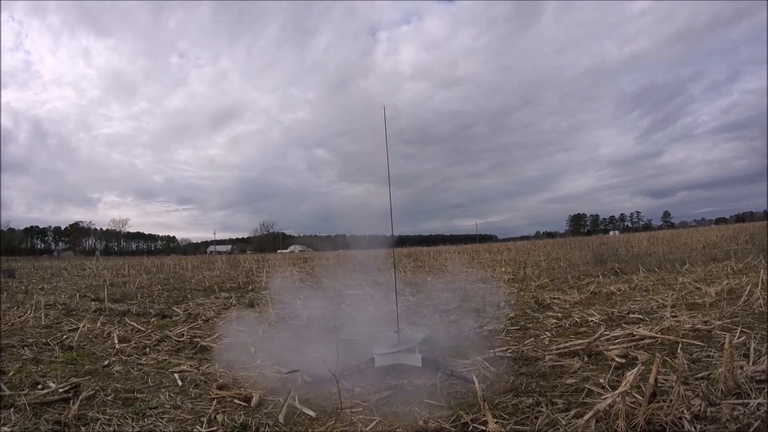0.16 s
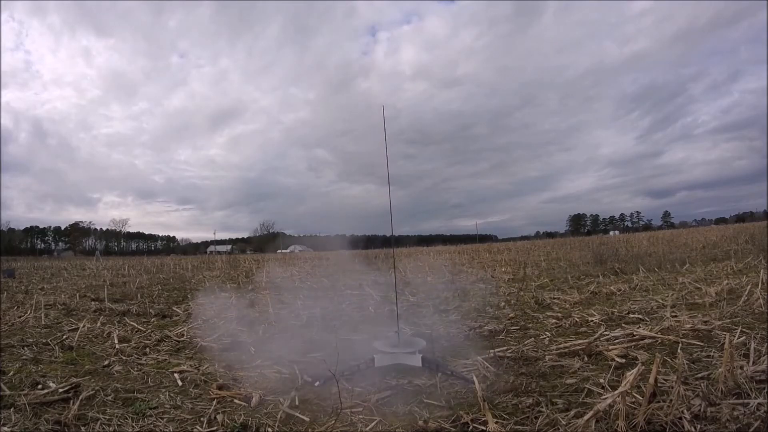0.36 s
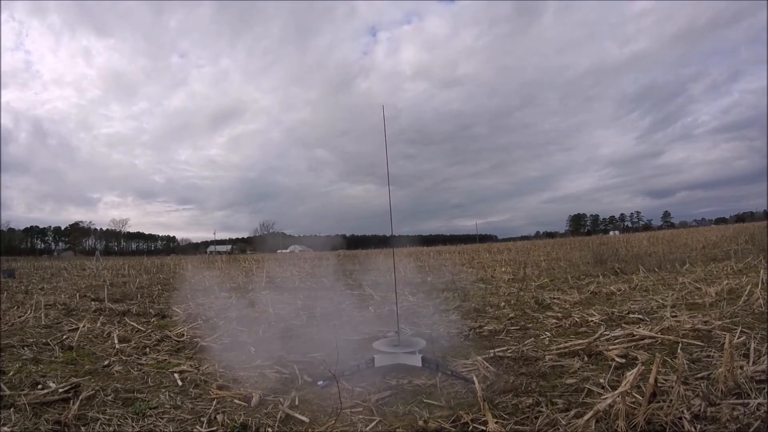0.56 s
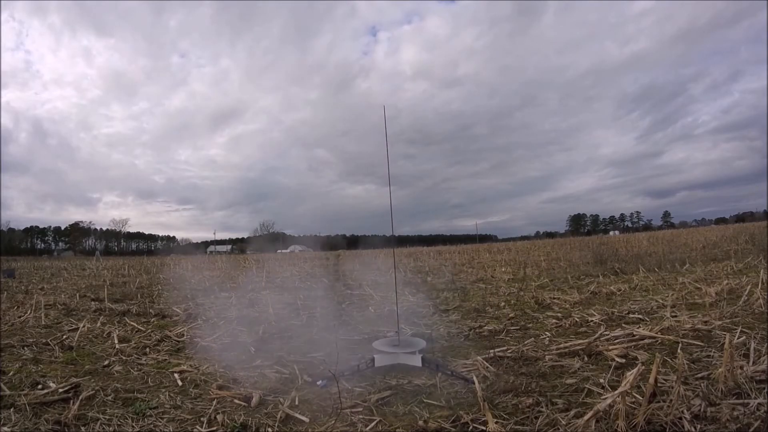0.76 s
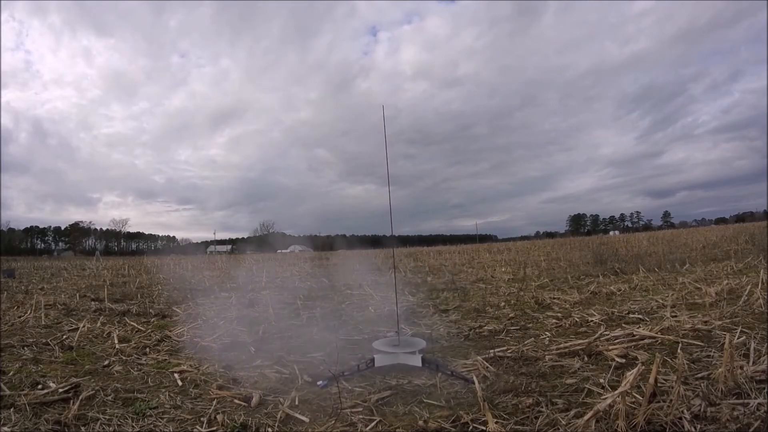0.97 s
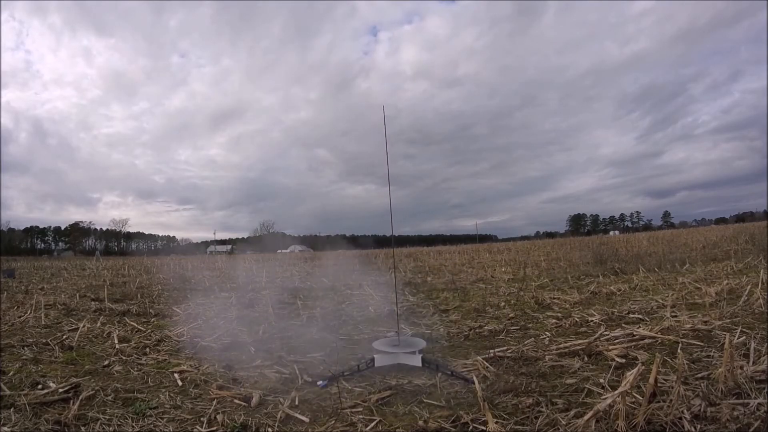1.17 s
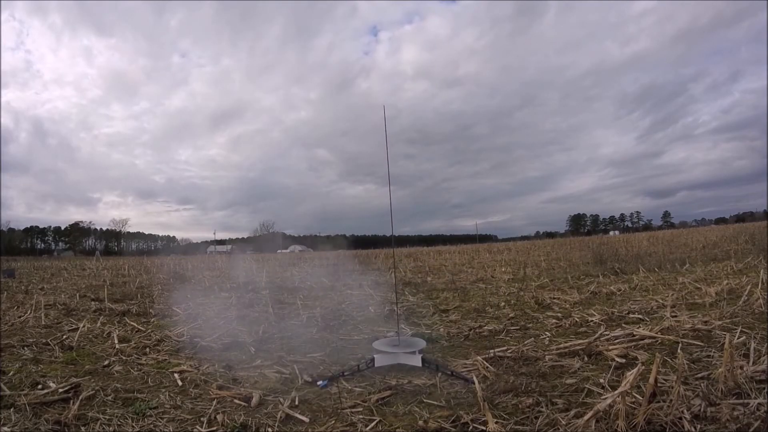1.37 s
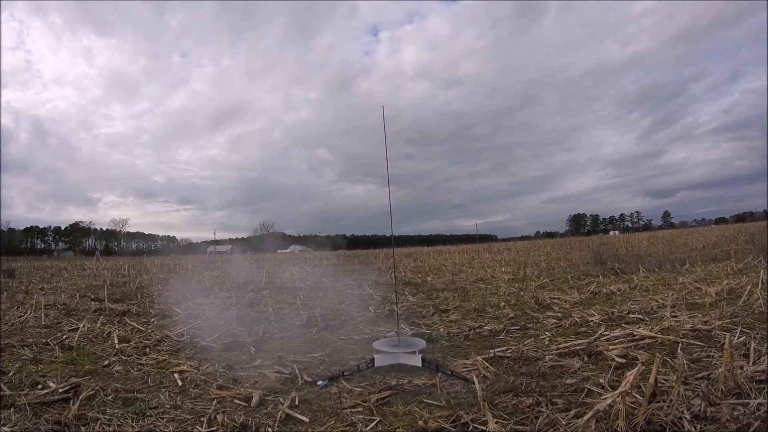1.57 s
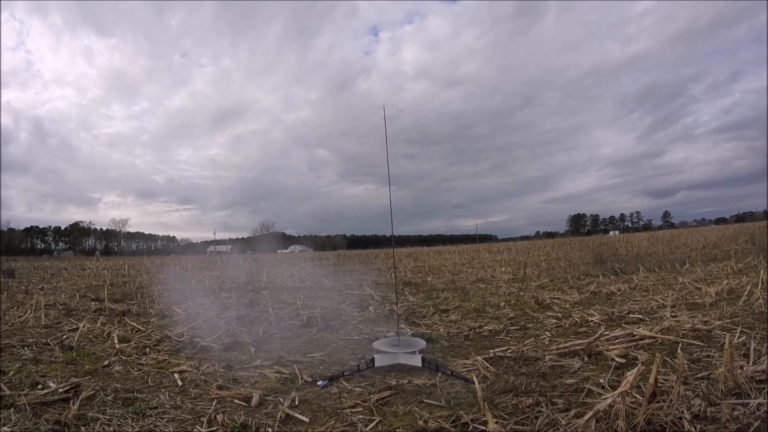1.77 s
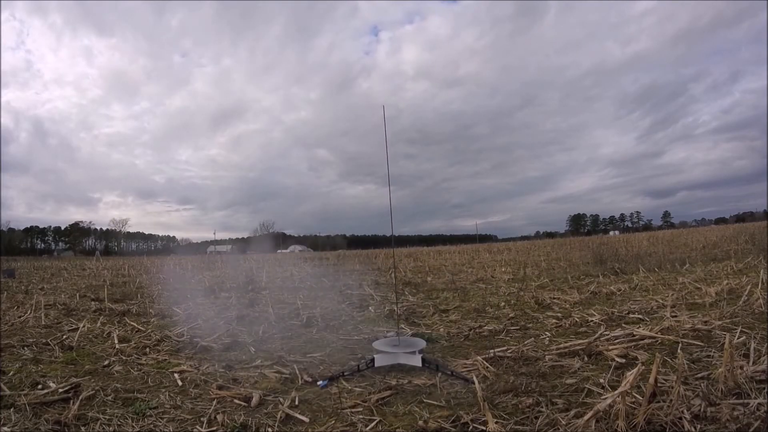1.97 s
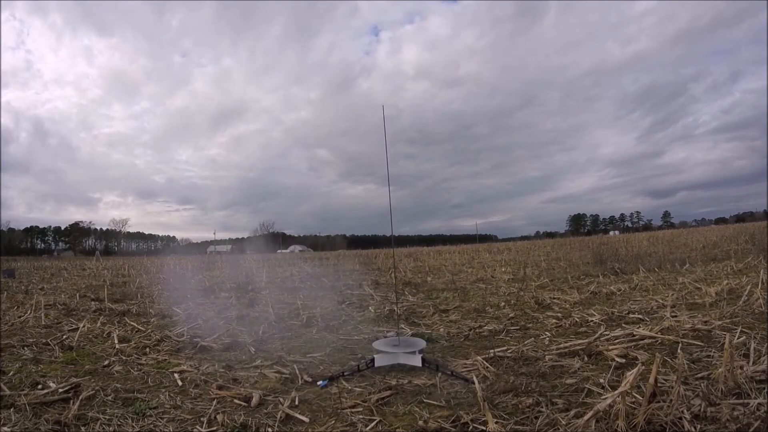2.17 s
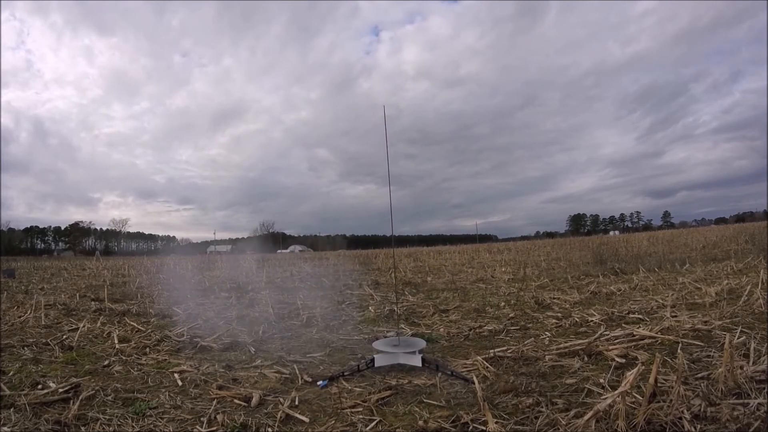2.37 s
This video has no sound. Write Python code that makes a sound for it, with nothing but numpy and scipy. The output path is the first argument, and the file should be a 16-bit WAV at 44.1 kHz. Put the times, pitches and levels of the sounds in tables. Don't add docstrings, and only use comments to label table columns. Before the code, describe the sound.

Harsh rushing jet of a small rocket already lifting off, swelling at once, then softening and losing treble overhead; sudden burnout, short scattered tail and quiet wind on a small camera microphone in an open field.

```python
import sys
import numpy as np
from scipy import signal
from scipy.fft import rfft, irfft, dct, next_fast_len
from scipy.io import wavfile
from scipy.ndimage import uniform_filter1d, map_coordinates

SR = 44100
rng = np.random.default_rng(int(sys.argv[2]) if len(sys.argv) > 2 else 0)


def transcribe(u):
    v = np.clip(np.atleast_2d(u).T, -1, 1)
    q = np.round(v * 32767).astype(np.int16)
    wavfile.write(sys.argv[1], SR, q)


def volts(x):
    e = np.asarray(x, float) / 20
    return 10 ** e


N = 106942
TIME_S = np.arange(N) / SR


def unit(x):
    return x / np.sqrt(np.mean(x ** 2) + 1e-20)


def along(points, hz):
    f, value = np.transpose(points)
    return np.interp(np.log(hz + 1), np.log(f + 1), value)


def curve(rows):
    s, value = np.transpose(rows)
    return np.interp(TIME_S, s, value)


def wobble(knots_per_s):
    knots = rng.standard_normal(int(N * knots_per_s / SR) + 4)
    return map_coordinates(knots, [np.arange(N) * knots_per_s / SR])


def filtered(x, response):
    size = next_fast_len(N + 8192)
    hz = np.fft.rfftfreq(size, 1 / SR)
    return irfft(rfft(x, size) * response(hz), size)[:N]


def rush(colour_db, patchy_db, size):
    hz, t, z = signal.stft(rng.standard_normal(N), SR, nperseg=size)
    patches = uniform_filter1d(rng.standard_normal(z.shape), 6, 0)
    patches = uniform_filter1d(patches, 10, 1)
    gain = volts(colour_db(hz[:, None], t))
    z = z * gain / np.sqrt(np.mean(gain ** 2, axis=0))
    z = z * volts(patchy_db * unit(patches))
    return unit(signal.istft(z, SR, nperseg=size)[1][:N])


# t/s, level/dB
BURN_LEVEL = [
    (0.0, -27.5),
    (0.16, -22.5),
    (1.02, -29),
    (1.68, -26),
    (1.76, -29.5),
    (1.78, -27),
    (2.1, -28),
    (2.13, -32.5),
]
# f/Hz, level/dB per Hz
NEAR_COLOUR = [(90, -42), (200, -41), (600, -10), (1250, -12), (3300, 1), (7500, -4.5), (12000, -16.5),
               (15500, -31)]
MIDWAY_COLOUR = [(90, -47), (200, -19), (600, -10), (1300, -10), (2600, 0.5), (7500, -4.5), (12000, -20),
                 (15500, -33)]
HIGH_COLOUR = [(90, -36), (200, -22.5), (600, -8.5), (1200, -10.5), (2100, 0.5), (7500, -12.5),
               (12000, -32.5), (15500, -49)]
COLOUR_TIMES_S = [.3, .9, 1.75]
BURNOUT_S, DIE_DB_PER_S = 2.136, 900
DULL_DB, DULL_S, DULL_HZ = -6, 0.017, 8000


def jet_colour(hz, s):
    colour_db = DULL_DB * np.exp(-s / DULL_S) / (1 + (DULL_HZ / (hz + 1)) ** 4)
    for k, colour in enumerate([NEAR_COLOUR, MIDWAY_COLOUR, HIGH_COLOUR]):
        share = np.interp(s, COLOUR_TIMES_S, np.eye(3)[k])
        colour_db = colour_db + share * along(colour, hz)
    return colour_db


def jet():
    hiss = rush(jet_colour, patchy_db=1.25, size=512)
    dying_db = -DIE_DB_PER_S * np.clip(TIME_S - BURNOUT_S, 0, None)
    flutter_db = 0.13 * wobble(15.2) + 0.4 * wobble(59.35) + 0.31 * wobble(220)
    return hiss * volts(curve(BURN_LEVEL) + dying_db + flutter_db)


# f/Hz, width/Hz, level/dB
CASE_MODES = [(765, 116, 4.5), (2046, 460, 4), (2575, 380, -3), (3340, 160, 1), (3720, 140, 0),
              (4580, 390, -1), (5090, 800, 3.5), (6520, 400, 3.5), (7320, 440, -1.5), (8050, 1500, 2.5),
              (8550, 500, 4), (9470, 1220, -6.5), (11200, 1700, 1.5)]
# delay/ms, gain
CASE_ECHOES = [(0.428, -0.0028), (0.702, -0.03), (0.828, -0.052)]


def case(hz):
    modes_db = sum(db / (1 + (2 * (hz - f) / width) ** 2) for f, width, db in CASE_MODES)
    echoes = sum(g * np.exp(-2j * np.pi * hz * ms / 1000) for ms, g in CASE_ECHOES)
    return volts(modes_db) * (1 + echoes)


# f/Hz, level/dB per Hz
BANK_COLOUR = [(90, -35), (250, -8), (550, 2), (1200, -2), (2000, -1), (6500, -7), (12000, -28),
               (15500, -39)]
# f/Hz, level/dB per Hz
FIELD_COLOUR = [(130, -23), (330, -2.5), (750, -1.5), (1150, -8), (2100, 0.5), (5500, 0), (8500, -13.5),
                (15500, -38)]
ECHO_DB, ECHO_LATE_S, ECHO_DIE_DB_PER_S = -13.5, .046, 800
FIELD_DB, FIELD_T60_S = -20.5, 2


def field():
    after_s = np.clip(TIME_S - BURNOUT_S - ECHO_LATE_S, 0, None)
    echo = rush(lambda hz, s: along(BANK_COLOUR, hz), patchy_db=1.94, size=512)
    wash = rush(lambda hz, s: along(FIELD_COLOUR, hz), patchy_db=1.2, size=512)
    echo_db = ECHO_DB - ECHO_DIE_DB_PER_S * after_s
    wash_db = FIELD_DB - 60 * after_s / FIELD_T60_S + 0.34 * wobble(25)
    return volts(curve(BURN_LEVEL)) * (echo * volts(echo_db) + wash * volts(wash_db))


# delay/ms, gain
GROUND_ECHOES = [(3.17, -.08), (3.43, .08), (3.57, -.08), (3.76, .2), (3.84, .13), (3.965, .27),
                 (4.045, .14), (4.22, -.11)]
STEEP_START, STEEP_PER_S, STEEP_PER_S2 = .55, 5.5, 9
SHIMMER_MS = 0.01


def ground(x):
    steep = STEEP_START + STEEP_PER_S * TIME_S + STEEP_PER_S2 * TIME_S ** 2
    sine = steep / np.sqrt(1 + steep ** 2)
    wander_ms = SHIMMER_MS * wobble(7.6)
    out = x.copy()
    for ms, gain in GROUND_ECHOES:
        heard_s = TIME_S - (ms * sine + wander_ms) / 1000
        out += gain * map_coordinates(x, [heard_s * SR], mode="mirror")
    return out


# t/s, level/dB
WIND_LEVEL = [
    (0.0, -75),
    (1.04, -65),
    (1.65, -57.5),
    (1.71, -62),
    (1.83, -58),
    (1.91, -58),
    (2.32, -56),
    (2.33, -56),
    (2.42, -57),
]
# f/Hz, level/dB per Hz
WIND_COLOUR = [(12, -36), (25, -12), (40, -9), (70, -2), (110, -6.5), (200, -15.5), (400, -28), (800, -63)]


def wind():
    rumble = rush(lambda hz, s: along(WIND_COLOUR, hz), patchy_db=5.0, size=4096)
    return unit(rumble * volts(0.98 * wobble(12.05))) * volts(curve(WIND_LEVEL))


# t/s, step level under the strongest line/dB, top f/Hz
STARVED_FRAMES = [
    (.852, -2, 11000),
    (1.145, 0, 9400),
    (1.168, 0, 8800),
    (1.438, -7, 9200),
    (1.482, -3, 11200),
    (1.716, -4, 9200),
    (2.228, -13, 9400),
]
FRAME = 1650
STEP_FOLLOWS, STEP_SCATTER_DB = .75, 2


def starve(x):
    out = x.copy()
    window = np.sin(np.pi * (np.arange(FRAME) + .5) / FRAME)
    hz = np.arange(FRAME) * SR / 2 / FRAME
    for s, db, top_hz in STARVED_FRAMES:
        middle = round(s * SR)
        at = slice(middle - FRAME // 2, middle + FRAME // 2)
        lines = dct(out[at] * window, norm="ortho")
        local = np.sqrt(np.abs(uniform_filter1d(lines ** 2, size=120)) + 1e-14)
        scatter_db = STEP_SCATTER_DB * np.repeat(rng.standard_normal(FRAME), 24)[:FRAME]
        step = 3 * local.max() * (local / local.max()) ** STEP_FOLLOWS * volts(db + scatter_db)
        kept = np.round(lines / step) * step * (hz < top_hz)
        out[at] -= window * dct(lines - kept, type=3, norm="ortho")
    return out


def scene():
    outdoors = filtered(jet(), case) + field()
    return (volts(-3) * ground(outdoors) + wind())[None]


def roll_off(x):
    return signal.sosfilt(signal.butter(12, 15180, fs=SR, output="sos"), x)


def record(dry):
    mix = filtered(starve(dry[0]), lambda hz: np.clip((15300 - hz) / 300, 0, 1))[None]
    return roll_off(mix)


dry = scene()
out = record(dry)
transcribe(out)
```